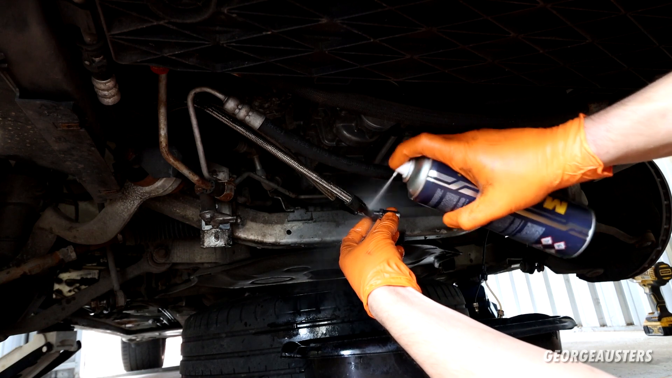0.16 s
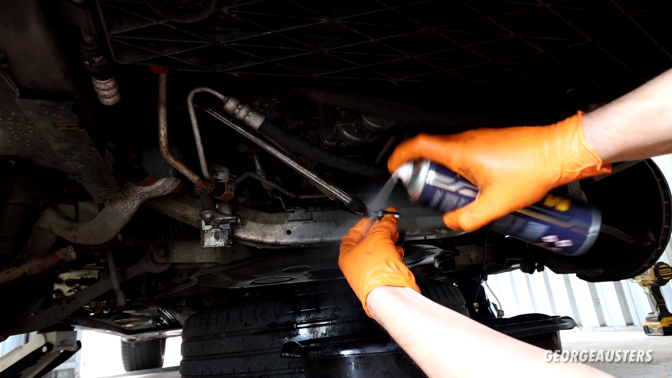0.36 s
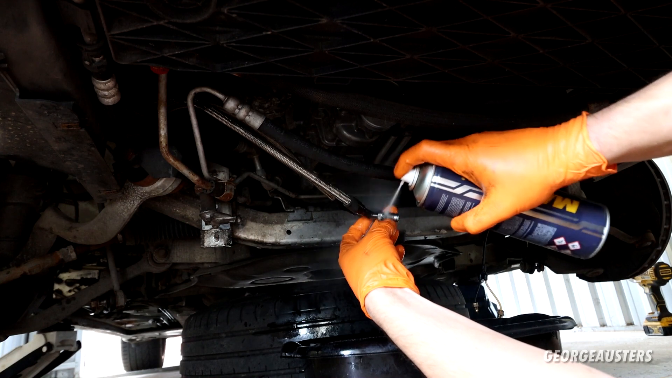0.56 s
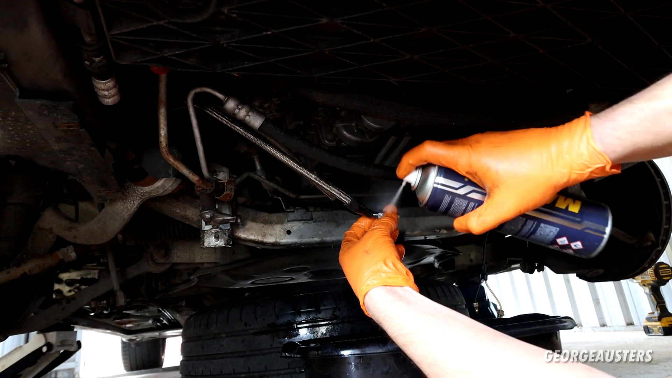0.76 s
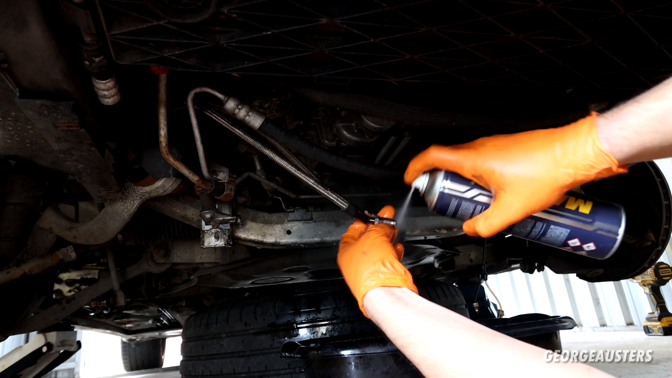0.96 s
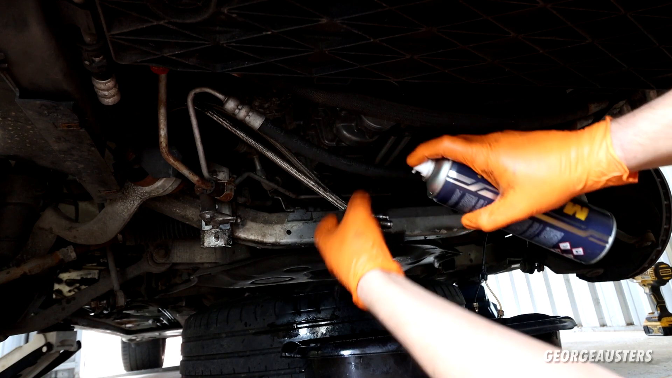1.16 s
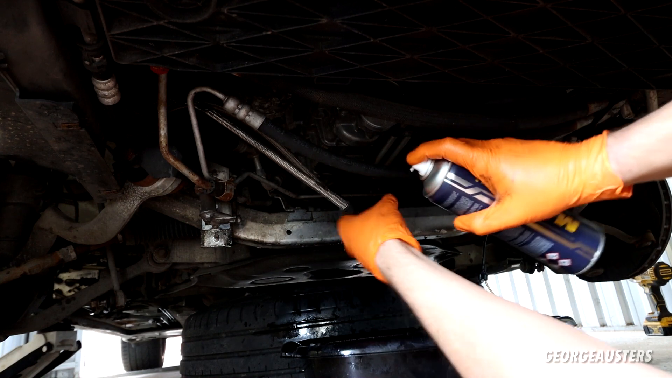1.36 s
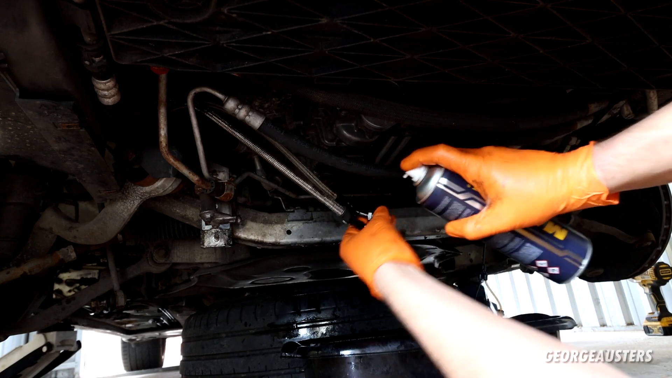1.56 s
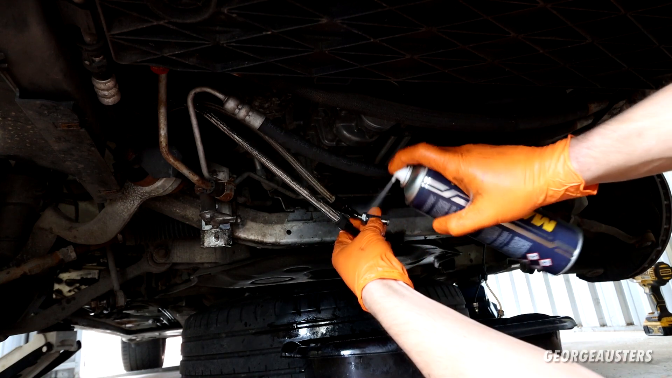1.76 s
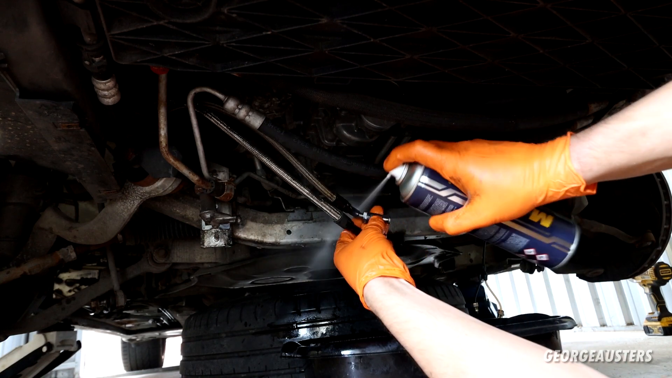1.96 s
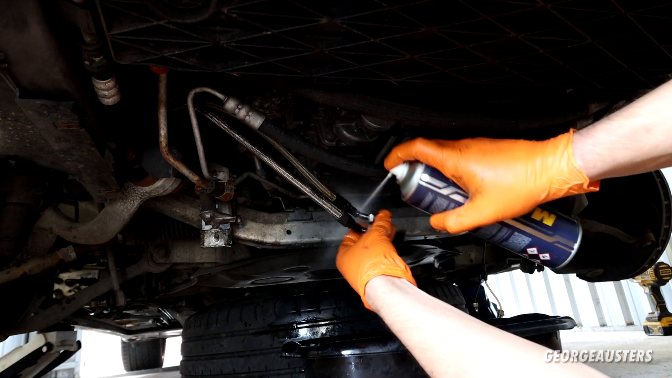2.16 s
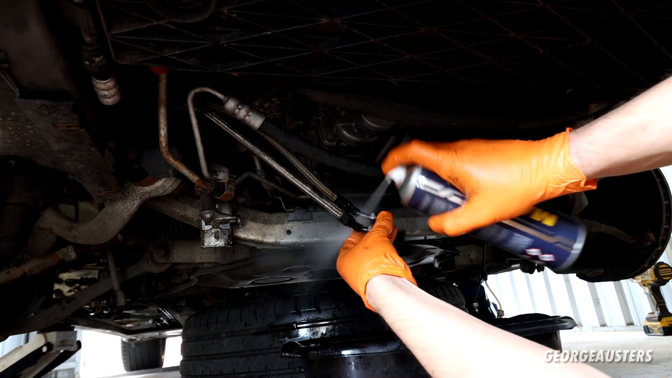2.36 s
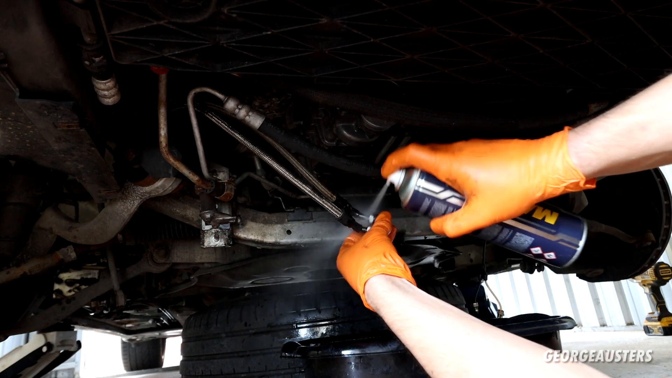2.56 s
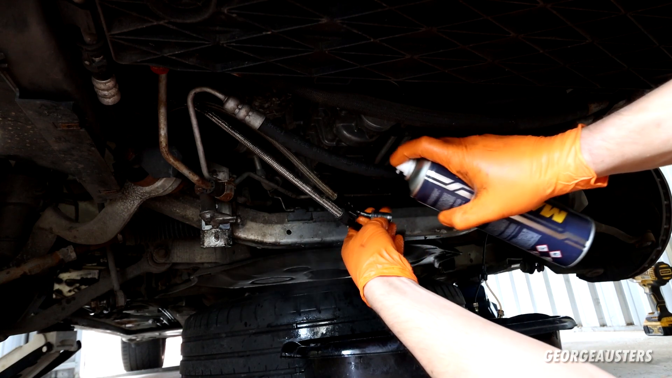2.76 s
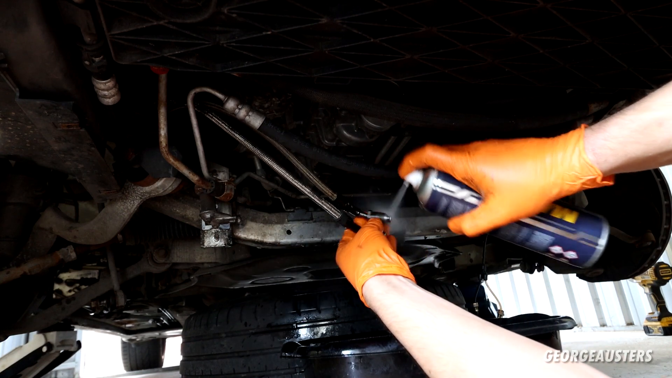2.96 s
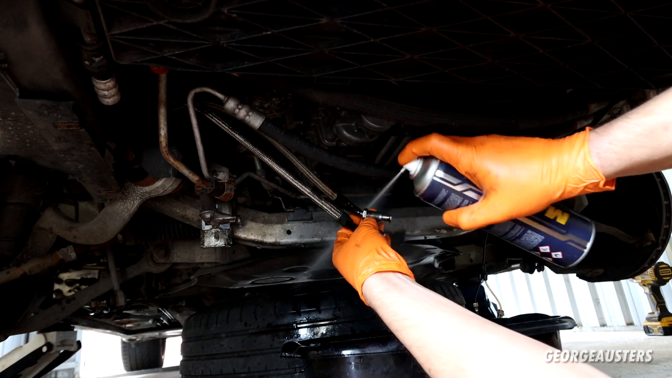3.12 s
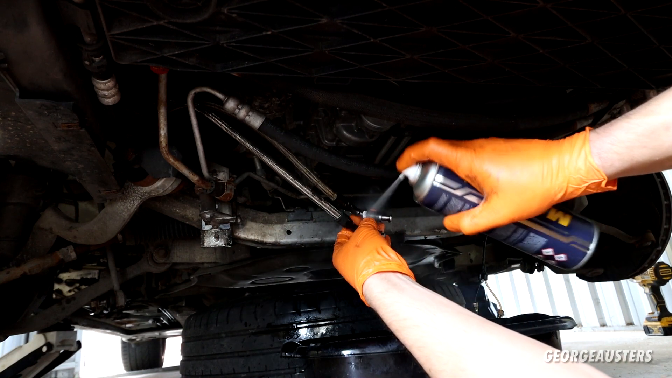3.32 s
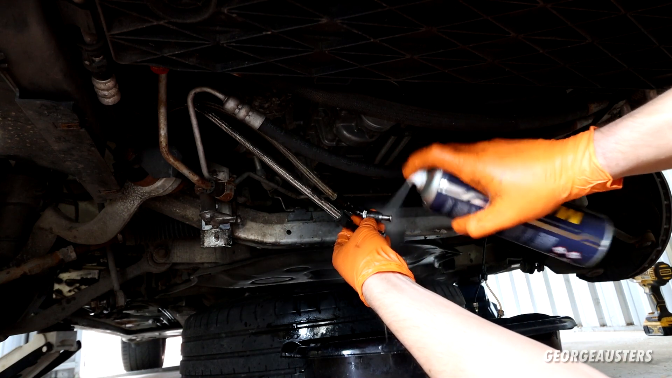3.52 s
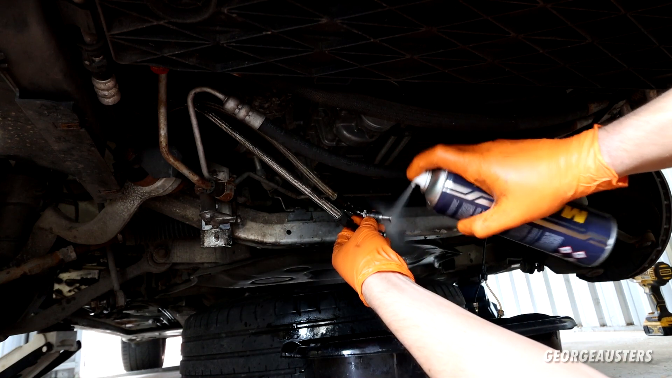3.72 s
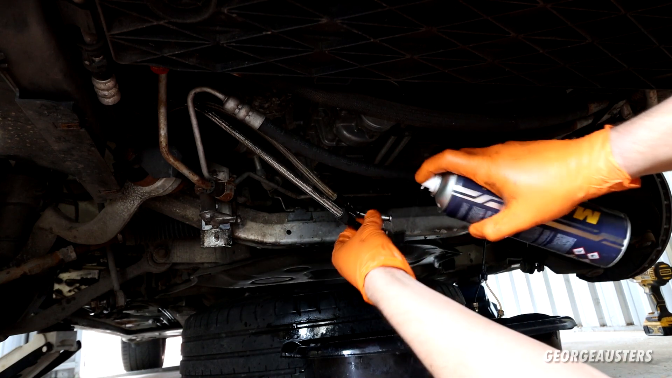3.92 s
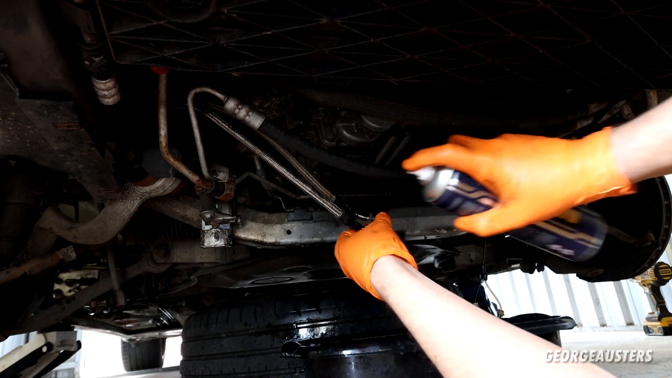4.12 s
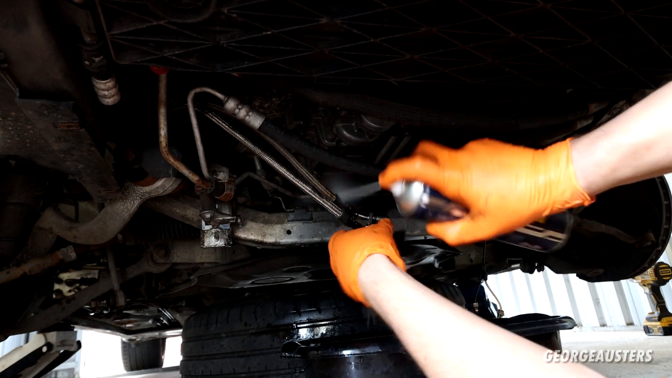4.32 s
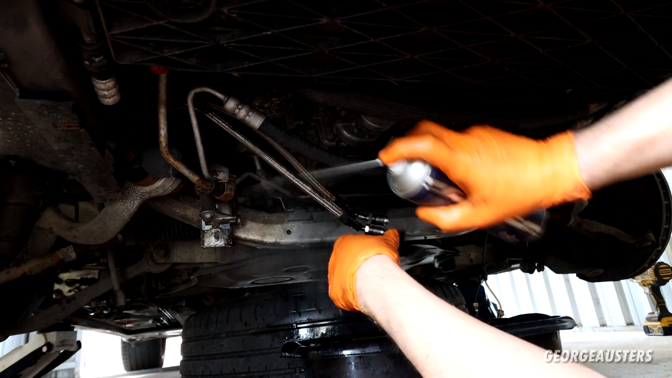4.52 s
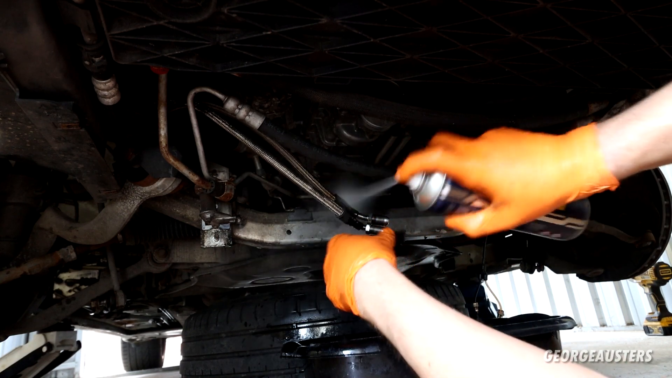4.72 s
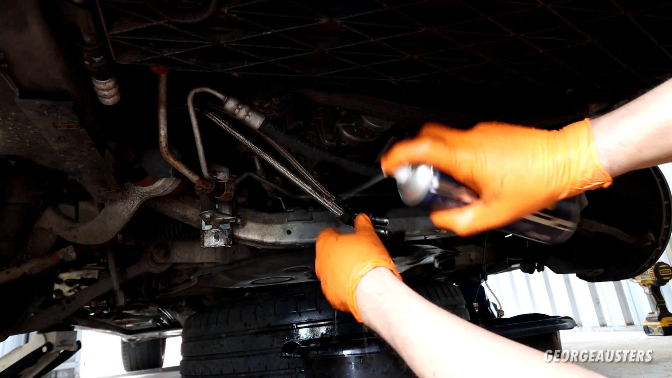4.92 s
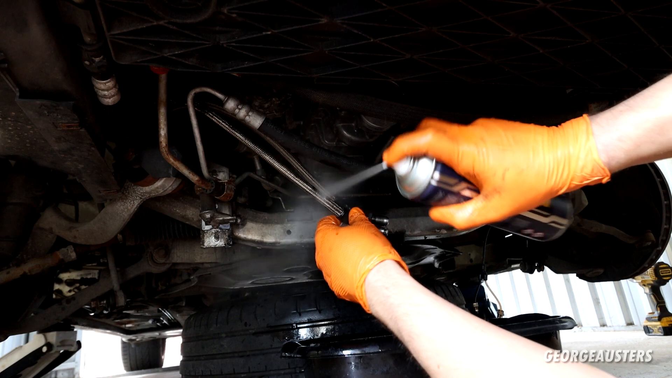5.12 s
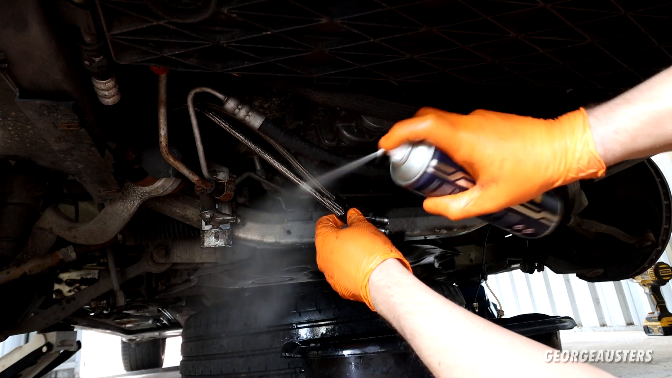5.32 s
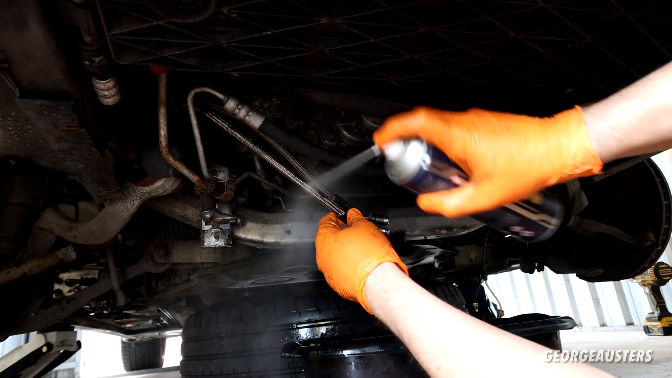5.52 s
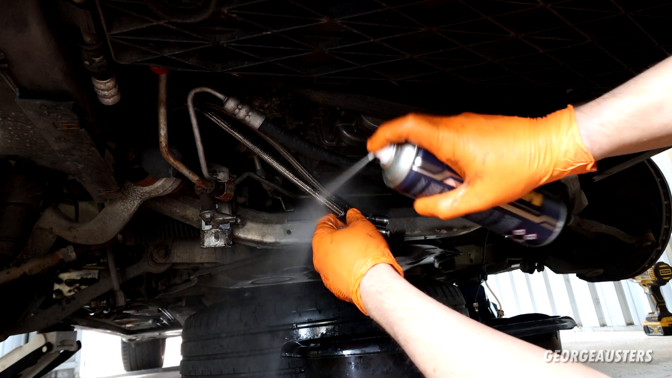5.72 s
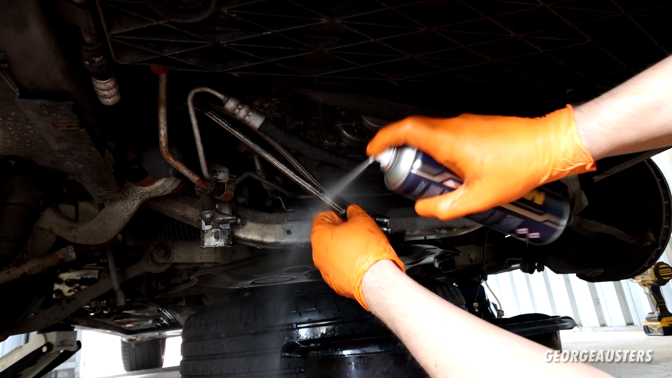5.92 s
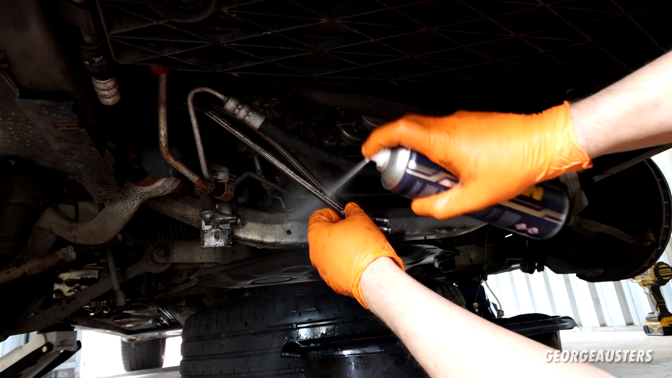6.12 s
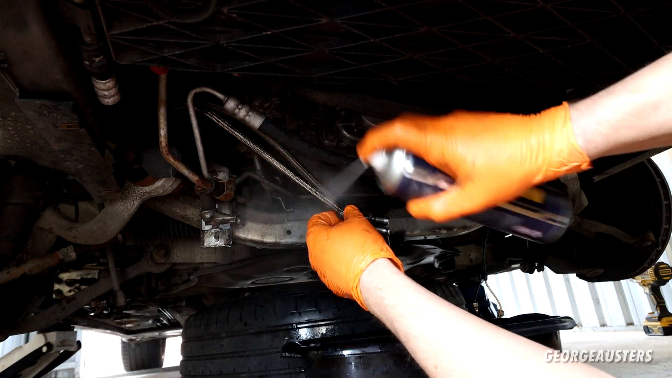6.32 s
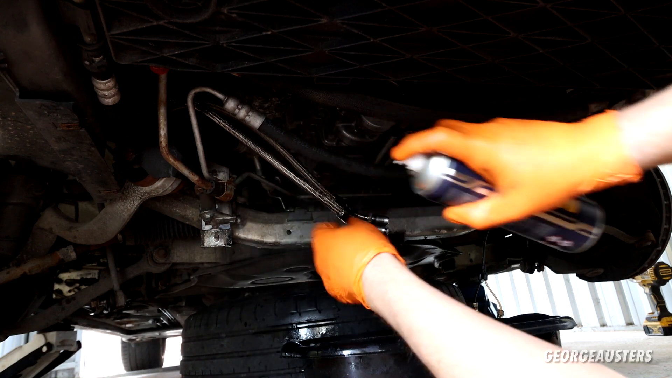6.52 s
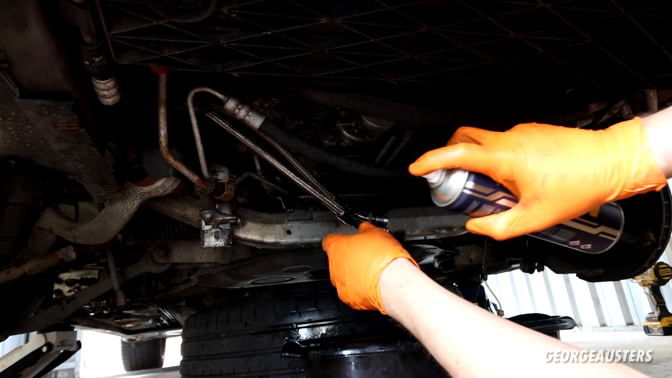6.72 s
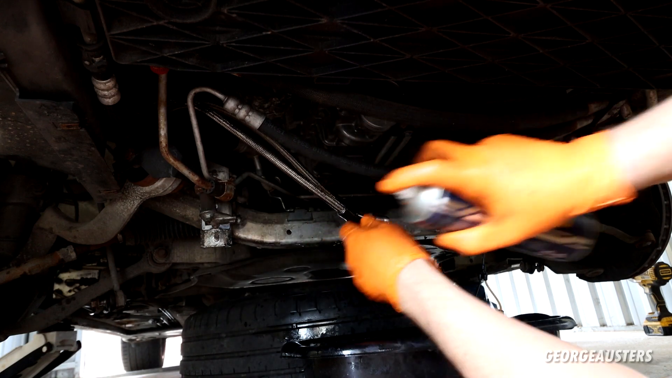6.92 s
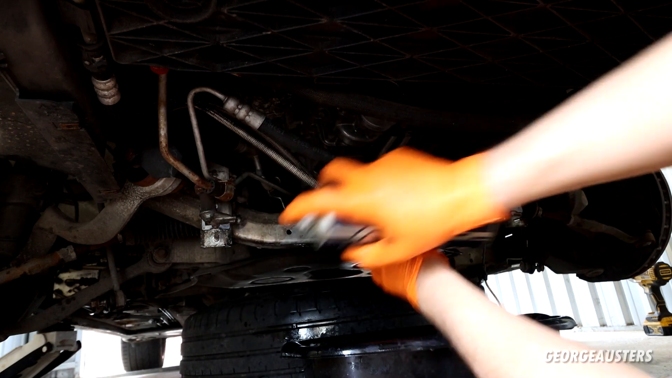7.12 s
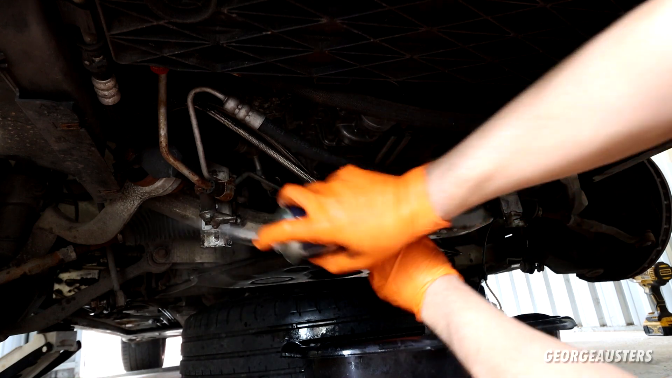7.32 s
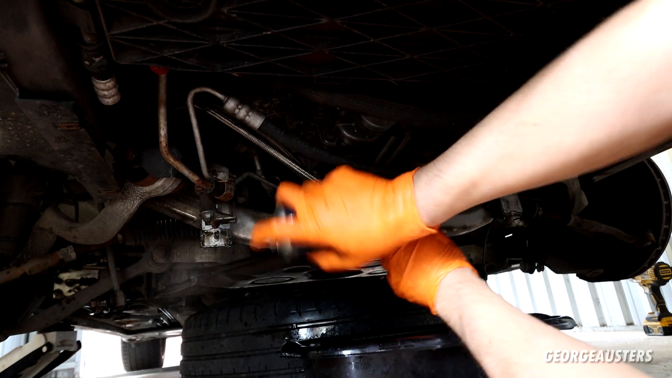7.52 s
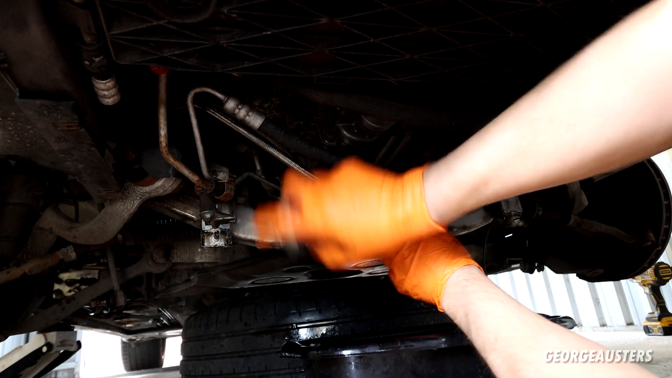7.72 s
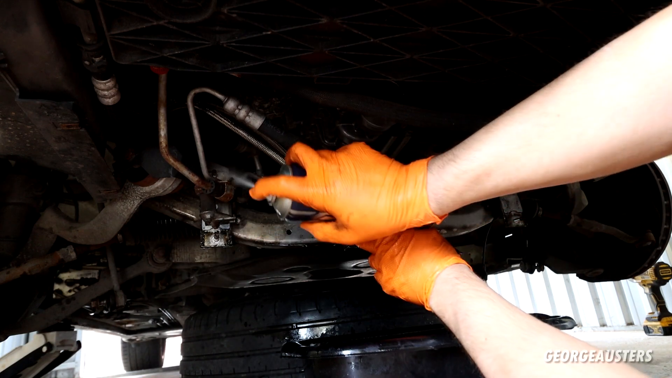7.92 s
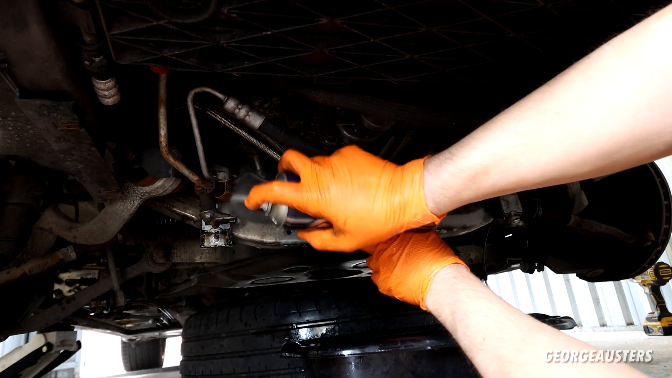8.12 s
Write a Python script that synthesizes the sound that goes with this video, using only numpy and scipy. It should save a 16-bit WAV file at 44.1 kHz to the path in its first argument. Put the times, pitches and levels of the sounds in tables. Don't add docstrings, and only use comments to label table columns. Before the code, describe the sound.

Close under a car in a garage, an aerosol can sprays in seven hissing bursts. The first is already running; two steady ones follow, then sweeping ones whose tone shifts as they cross pipes, and finally two hollower, fluttering ones. Between them gloves and sleeves rustle, the can ticks and knocks on metal. Faint birds, a dove and distant traffic lie behind. One microphone, short room echo.

```python
import sys
import numpy as np
from scipy import signal
from scipy.fft import rfft, irfft, next_fast_len
from scipy.io import wavfile
from scipy.ndimage import uniform_filter1d

SR = 44100
rng = np.random.default_rng(int(sys.argv[2]) if len(sys.argv) > 2 else 0)


def to_linear_factor(level_db):
    exponent = np.asarray(level_db, float) / 20
    return 10 ** exponent


def unload_audio(sound):
    columns = np.transpose(np.atleast_2d(sound))
    steps = np.round(np.clip(columns, -1, 1) * 32767)
    wavfile.write(sys.argv[1], SR, steps.astype(np.int16))


N = 364266
SIZE = next_fast_len(N)
HZ = np.maximum(np.fft.rfftfreq(SIZE, 1 / SR), 1)
TIME = np.arange(N) / SR


def rms_one(x):
    return x / np.sqrt(np.mean(x ** 2) + 1e-20)


def butter(x, order, hz, kind="low"):
    return signal.sosfilt(signal.butter(order, hz, kind, fs=SR, output="sos"), x)


def at_hz(points):
    hz, level_db = np.transpose(points)
    return to_linear_factor(np.interp(np.log(HZ), np.log(hz), level_db))


def bump(hz, centre_hz, octaves):
    return np.exp(-.5 * (np.log2(hz / centre_hz) / octaves) ** 2)


def drift(rate_hz):
    r = np.exp(-80 * np.pi * rate_hz / SR)
    slow = signal.lfilter([1], [1, -2 * r, r * r], rng.standard_normal(N // 40 + 2002))[2000:]
    return np.interp(np.arange(N) / 40, np.arange(len(slow)), rms_one(slow))


def noise(gain):
    return rms_one(irfft(rfft(rng.standard_normal(SIZE)) * gain, SIZE)[:N])


def gate(t0, t1, fade_s):
    return np.clip(np.minimum(TIME - t0, t1 - TIME) / fade_s + 1, 0, 1)


def passes(table):
    t = TIME[::44]
    flank_power = 2.6
    total_db = sum(level_db * np.exp(-np.abs((t - s) / half_s) ** flank_power) for s, half_s, level_db in table)
    return np.interp(TIME, t, total_db)


def whistles(table, fade_s, steady, blur):
    out = np.zeros(N)
    for t0, t1, start_hz, end_hz, level_db in table:
        on = slice(max(round((t0 - fade_s) * SR), 0), round((t1 + fade_s) * SR))
        t = TIME[on]
        wobble = butter(rng.standard_normal(SR), 4, blur * np.sqrt(start_hz))[-len(t):]
        strength = (steady + rms_one(wobble)) / np.hypot(steady, 1)
        phase = 2 * np.pi * np.cumsum(np.interp(t, [t0, t1], [start_hz, end_hz])) / SR
        out[on] += to_linear_factor(level_db + 1.5) * gate(t0, t1, fade_s)[on] * strength * np.sin(phase)
    return out


# Hz, level in dB per Hz.
STREET = [(15, -51.5), (25, -31.5), (75, 6.5), (154, 5), (438, -0.5), (749, -1), (1000, 0.5), (1310, -7.5),
          (2180, -13), (4380, -9), (6040, -37), (9770, -19), (12000, -30.5), (16000, -33)]
# Hz, level in dB.
MAINS_HUM = [(150, -77)]


def street():
    out = to_linear_factor(-65 + 0.72 * drift(2.5)) * noise(at_hz(STREET))
    for hz, level_db in MAINS_HUM:
        out += np.sqrt(2) * to_linear_factor(level_db + 2.2 * drift(3.25)) * np.sin(2 * np.pi * hz * TIME)
    return out


# press in seconds, release in seconds, flow in dB, opening time in seconds,
# lift of the thin air in dB.
BURSTS = [
    (-.1, 1.121, -34.5, .04, 0),
    (1.832, 2.743, -34.5, 0.044, 0.5),
    (2.986, 3.974, -35, 0.055, 0),
    (4.367, 4.914, -36, 0.035, -1.5),
    (5.017, 6.552, -37, 0.042, 0.5),
    (7.3, 7.88, -37.5, 0.03, 3),
    (7.995, 8.4, -41, 0.027, 5.5),
]
AIM = [0, 0, 0, 1, 1, 2, 2]


def burst_at(s):
    press_s = np.transpose(BURSTS)[0]
    return np.maximum(np.searchsorted(press_s - .02, s) - 1, 0)


# Hz, level in dB per Hz.
AT_FITTING = [(88, -51), (150, -25.5), (550, -16), (948, -10.5), (1290, -12), (2180, -11.5), (2450, -8.5),
              (2920, -15), (5540, -2), (6730, -5), (9540, -7.5), (15500, -18.5)]
ALONG_PIPE = [(88, -52.5), (150, -21), (290, -8.5), (530, -9), (912, -0.5), (1290, -4.5), (2410, -7.5),
              (2860, -8.5), (3350, -2), (5760, -1.5), (10100, -3.5), (15500, -16)]
INTO_FRAME = [(88, -42), (150, -14.5), (519, -6), (607, -9.5), (695, -3.5), (827, -6), (1090, -1),
              (1910, -2.5), (4750, -0.5), (9540, -5.5), (15500, -18)]
# Hz, width in Hz, lift in dB for aims 0, 1 and 2.
UNDERBODY = [(314, 290, 5, 0.5, 3.5), (950, 186, 7.5, 0.5, 3), (1496, 62, 7, 3, -2),
             (657, 70, 4.5, 0.5, 1.5), (1830, 160, 4.5, 0, -4), (2418, 76, 8, 6.5, 1.5),
             (2613, 104, 4.5, 1, 0.5), (3000, 1120, -1, 0.5, -2), (3490, 148, 4.5, -1, 1.5),
             (3696, 140, 7, -2.5, 1), (4500, 580, -4.5, -1.2, 0.5), (5177, 1360, 3.5, -2, 3.5),
             (5840, 930, 3, 2.5, 0.5), (7500, 250, 1, -0.5, -3), (9400, 460, 4.5, -0.3, 3.5),
             (11160, 760, 3, -1, -1.5)]


def jet_hiss(aim_now):
    hiss = []
    for aim, spectrum in enumerate([AT_FITTING, ALONG_PIPE, INTO_FRAME]):
        lift_db = sum(row[2 + aim] / (1 + (2 * (HZ - row[0]) / row[1]) ** 2) for row in UNDERBODY)
        hiss.append(noise(at_hz(spectrum) * to_linear_factor(lift_db)))
    return np.choose(aim_now, hiss)


# extra path in ms, level in dB.
REFLECTORS = [(.7, -18.5), (1.3, -39), (2.298, -19), (3.698, -9.5), (5.9, -33)]
SWAY_MS = [.03, .1, .12]


def reflect(jet, aim_now):
    heard = jet.copy()
    bright = butter(jet, 2, 2800, "high")
    for path_ms, level_db in REFLECTORS:
        lag = (path_ms + np.array(SWAY_MS)[aim_now] * drift(3)) * SR / 1000
        heard += to_linear_factor(level_db) * np.interp(np.arange(N) - lag, np.arange(N), bright)
    return rms_one(heard)


# time in seconds, half length in
# seconds, Hz, level in dB.
PARTS = [(0.136, 0.044, 2330.0, -3), (0.159, 0.039, 4470, 6), (0.444, 0.054, 9610.0, 0.5),
         (0.447, 0.052, 7630.0, 3), (0.618, 0.062, 2320, -3), (0.714, 0.044, 3710.0, 3.5),
         (0.826, 0.077, 2590, 8), (0.961, 0.15, 11430.0, -3), (1.928, 0.052, 3600.0, 3.5),
         (2.167, 0.045, 7200.0, 5), (2.177, 0.044, 4440, 5), (2.397, 0.038, 4410.0, 5),
         (3.23, 0.057, 7850.0, 3.5), (3.416, 0.064, 9340.0, 5.5), (3.518, 0.028, 2470.0, 3),
         (3.701, 0.047, 3710.0, 7), (3.828, 0.073, 11430.0, 3), (4.415, 0.0195, 2700.0, 8),
         (4.435, 0.037, 6230.0, 3.5), (4.461, 0.079, 3260, -9), (4.484, 0.097, 2590, 8),
         (4.773, 0.03, 8320.0, 2.5), (4.859, 0.041, 6600.0, 2), (5.06, 0.015, 3250.0, 6),
         (5.172, 0.034, 4670.0, 2), (5.306, 0.079, 2620.0, -3), (5.378, 0.042, 4840, 5),
         (5.515, 0.059, 4410.0, 0), (5.88, 0.058, 11100.0, 1.5), (6.083, 0.031, 5240.0, 2.5),
         (6.121, 0.043, 4280.0, -9.5), (6.362, 0.063, 2473, 6.5), (7.358, 0.033, 4500, -12),
         (7.488, 0.034, 2330.0, -9.5), (7.717, 0.052, 3500.0, 3), (7.735, 0.079, 2780.0, 2.5),
         (7.84, 0.05, 3000.0, 0),
         (4.429, 0.034, 3900, 8), (4.56, 0.039, 12500, 4), (4.57, 0.041, 4700, 3),
              (4.6, 0.077, 12200, 2), (4.65, 0.26, 4800, 0.5), (4.659, 0.054, 5900, 4),
              (4.775, 0.12, 4960, 3), (4.841, 0.054, 12800, 5), (4.87, 0.026, 10450, 2.5),
              (5.092, 0.039, 9330, 0), (5.117, 0.052, 4300, 3), (5.193, 0.031, 9900, -4),
              (5.21, 0.062, 3700, -3), (5.317, 0.041, 9600, 4), (5.521, 0.062, 12800, 0),
              (5.526, 0.044, 9100, 4), (5.608, 0.116, 5600, 0.5), (5.863, 0.055, 5600, 3),
              (5.875, 0.07, 9100, -4.5), (6.194, 0.065, 13200, -3), (6.255, 0.028, 9600, 2.5),
              (6.345, 0.063, 4650, -3), (6.5, 0.029, 4700, -7.5), (7.347, 0.0264, 7800, -9),
              (7.46, 0.057, 3990, 5), (7.764, 0.12, 7660, 5), (7.851, 0.025, 13200, -3),
              (8.044, 0.026, 9600, 2), (8.14, 0.041, 5660, -10), (8.147, 0.07, 7000, 4),
              (8.191, 0.045, 4200, 3), (8.202, 0.039, 12800, 4)]
FLICKER_DB = [.7, 1.2, 1.2]


def move_can(heard, boom_db, splash_db, thin_air_db, aim_now):
    whole, out, step_octaves, ring_octaves = rfft(heard, SIZE), 0, 1 / 5, 0.08
    for hz in 150 * 2 ** np.arange(0, 6.9, step_octaves):
        window = np.cos(np.pi / 2 * np.clip(np.log2(HZ / hz) / step_octaves, -1, 1)) ** 2
        move_db = bump(hz, 980, 0.99) * boom_db + bump(hz, 6020, 0.089) * splash_db
        move_db = move_db + bump(hz, 11700, 0.9) * thin_air_db
        near = [(s, half_s, db * bump(hz, part_hz, ring_octaves))
                for s, half_s, part_hz, db in PARTS
                if abs(np.log2(hz / part_hz)) < 3 * ring_octaves]
        if near:
            move_db = move_db + passes(near)
        flicker_db = (hz / 5000) ** 0.19 * np.array(FLICKER_DB)[aim_now] * drift(14.6)
        out = out + irfft(whole * window, SIZE)[:N] * to_linear_factor(move_db + flicker_db)
    return out


SCATTER_DB = [1.1, 1.4, 1.2]


def scatter(jet):
    hz, s, cells = signal.stft(jet, SR, nperseg=512)
    patches = rng.standard_normal(cells.shape)
    for _ in range(2):
        patches = uniform_filter1d(uniform_filter1d(patches, size=3, axis=0), size=6, axis=1)
    aim = np.array(AIM)[burst_at(s)]
    from_hz = 4500
    depth_db = np.array(SCATTER_DB)[aim] * np.clip(hz / from_hz - .5, 0, 1)[:, None]
    return signal.istft(cells * to_linear_factor(depth_db * rms_one(patches)), SR, nperseg=512)[1][:N]


# time in seconds, half length in seconds, flow in dB.
SURGES = [(.86, .22, 2), (1.866, .009, -3), (2.42, 0.03, 2.5), (3.39, 0.24, 2.2), (4.63, 0.079, 5.5),
          (4.81, 0.036, 3.5), (5.074, 0.051, 3), (5.28, 0.088, 2.5), (5.53, 0.32, 2), (5.664, 0.047, -3),
          (6.38, 0.043, 1), (6.525, 0.021, 7), (7.33, 0.026, 3.5), (7.605, 0.015, -8), (7.76, 0.13, 6),
          (8.062, 0.018, 9.5)]
# time in seconds, half length in seconds, air lost in dB.
HOLLOWS = [
    (4.42, 0.067, 0),
    (4.718, 0.0122, 3),
    (5.145, 0.007, 12),
    (7.605, 0.0094, 7),
    (7.655, 0.018, 6),
    (7.76, 0.098, 5.5),
    (7.83, 0.035, 3),
    (8.055, 0.0382, 9),
]
# time in seconds, half length in seconds, splash in dB.
PIPES = [(.75, 0.16, 0.5), (1.87, 0.019, -6), (2.63, 0.078, 0), (3.45, 0.42, -3.5), (4.66, 0.16, -7),
         (4.77, 0.022, -0.5), (5.274, .06, -6), (5.4, 0.06, -1), (5.66, 0.046, 9.5), (5.9, 0.07, 3),
         (6.12, 0.061, 7.5), (6.36, 0.053, 11), (7.325, 0.022, -4), (7.85, 0.0195, 4.5)]


def spray():
    press_s, release_s, full_db, opening_s, air_db = np.transpose(BURSTS)
    now = burst_at(TIME)
    aim_now = np.array(AIM)[now]
    valve = sum(gate(t0, t1, fade_s=0.00174) for t0, t1 in zip(press_s, release_s))
    surge_db, hollow_db = passes(SURGES), passes(HOLLOWS)
    cracked_open_db, closing_db, closing_s = -19, -14.5, 0.02
    weak_db = cracked_open_db * np.clip(1 - (TIME - press_s[now]) / opening_s[now], 0, 1)
    sag_db = closing_db * np.clip(1 - (release_s[now] - TIME) / closing_s, 0, 1)
    flow_db = full_db[now] + weak_db + sag_db + surge_db
    boom_db = -0.522 * weak_db - 1.015 * surge_db + 0.97 * hollow_db
    thin_air_db = air_db[now] + 0.63 * weak_db - 0.99 * surge_db - hollow_db
    heard = reflect(jet_hiss(aim_now), aim_now)
    jet = move_can(heard, boom_db, passes(PIPES), thin_air_db, aim_now)
    droplets_db = 0.43 * drift(83)
    return scatter(jet * valve * to_linear_factor(flow_db + droplets_db))


def garage(x):
    t60_s, top_t60_s, wall_cut_hz, level_db = 0.31, 0.19, 4100, -11.5
    t = TIME[:SR // 2]
    white = rng.standard_normal(len(t))
    low = butter(white, 1, wall_cut_hz)
    echoes = low * to_linear_factor(-60 * t / t60_s) + (white - low) * to_linear_factor(-60 * t / top_t60_s)
    echoes *= np.clip(t / 0.00722 - .5, 0, 1)
    return to_linear_factor(level_db) * signal.fftconvolve(x, echoes / np.sqrt(np.sum(echoes ** 2)))[:N]


# time in seconds, low edge in Hz, high edge in Hz, level in dB.
SLIPS = [(.025, 10460, 11500, -63), (.396, 4380, 5200, -49), (.605, 7030, 8770, -41),
         (2.022, 4230, 5400, -45), (2.022, 6100, 8300, -45.5), (5.203, 4300, 5240, -47.5),
         (5.203, 8500, 9600, -48), (5.412, 10320, 11500, -52.5), (6.062, 4200, 5240, -52),
         (6.062, 9600, 11200, -51.5), (6.224, 9060, 10300, -47), (6.224, 13100, 15200, -59.5),
         (6.364, 11200, 12340, -52)]


def slips():
    half = 1024
    around = np.arange(-half, half)
    out = np.zeros(N)
    for s, low_hz, high_hz, level_db in SLIPS:
        puff = rms_one(butter(rng.standard_normal(2 * half), 6, [low_hz, high_hz], "band"))
        out[round(s * SR) + around] += to_linear_factor(level_db) * puff * np.cos(np.pi / 2 * around / half)
    return out * [[1], [-1]]


# start in seconds, end in seconds, glove in dB, sleeve in dB, swell in dB per s.
RUBS = [(1.166, 1.325, -65.5, -61, 2), (1.34, 1.497, -57.5, -58, -10), (1.52, 1.66, -64.5, -58.5, -125),
        (1.71, 1.84, -68, -66.5, -55), (2.804, 2.99, -69.5, -90, -3.5), (4.04, 4.1, -65, -60, -125),
        (4.115, 4.173, -59, -60, -170), (4.203, 4.378, -63, -60.5, 69.5), (4.929, 4.985, -49, -54.5, -300),
        (4.999, 5.028, -65, -66, 110), (6.58, 6.98, -64.5, -63, -28), (6.999, 7.064, -65, -62, -105),
        (7.088, 7.147, -62, -57.5, -84.5), (7.155, 7.31, -58.5, -64.5, -14),
        (7.897, 8.01, -51, -54.5, -105)]
# Hz, level in dB per Hz.
GLOVE = [(820, -9), (1400, 2), (1830, 0.5), (3740, 0.5), (5790, 0.5), (7130, -5), (11700, -17),
         (15000, -25.5)]
# Hz, level in dB per Hz.
SLEEVE = [(120, -21.5), (200, -9), (290, -3), (555, -5.5), (1040, -5), (1500, -15.5), (1950, -31.5),
          (3300, -120)]


def rustle():
    glove, sleeve = 0, 0
    for t0, t1, glove_db, sleeve_db, swell_db_per_s in RUBS:
        swell_db = swell_db_per_s * np.clip(TIME - t0, 0, t1 - t0)
        moving = gate(t0, t1, fade_s=0.035)
        glove = np.maximum(glove, moving * to_linear_factor(glove_db + swell_db))
        sleeve = np.maximum(sleeve, moving * to_linear_factor(sleeve_db + 0.82 * swell_db))
    grain = to_linear_factor(0.87 * drift(58) + 0.98 * drift(18))
    return grain * (glove * noise(at_hz(GLOVE)) + sleeve * noise(at_hz(SLEEVE)))


# start in seconds, end in seconds, start Hz, end Hz, level in dB.
SMALL_BIRDS = [(1.19, 1.33, 4800, 4500, -64), (1.565, 1.6, 8200, 7900, -75.5),
               (1.59, 1.63, 7600, 7300, -74), (1.61, 1.693, 6600, 6800, -70.5),
               (1.665, 1.71, 5760, 5470, -72), (1.715, 1.763, 5640, 6550, -67.5),
               (1.75, 1.84, 6900, 6900, -65), (1.717, 1.84, 3900, 4080, -72.5),
               (2.78, 2.98, 6360, 6440, -65.5), (2.89, 2.97, 4400, 4240, -64),
               (4.19, 4.36, 4700, 6200, -67), (6.6, 6.8, 6100, 6030, -78.5)]
# start in seconds, end in seconds, start Hz, end Hz, level in dB.
DOVE = [
    (7.0, 7.08, 439, 508, -63.5),
    (7.11, 7.2, 542, 543, -58.5),
    (7.38, 7.62, 542, 534, -56),
    (8.1, 8.26, 506, 522, -56),
]


def birds():
    chirps = whistles(SMALL_BIRDS, fade_s=0.021, steady=0.41, blur=5.2)
    return chirps + whistles(DOVE, fade_s=0.018, steady=1.9, blur=0.85)


# time in seconds, crack in dB, centre in Hz, T60 in seconds, width in octaves.
TICKS = [(1.485, -53, 3800, 0.054, 1.2), (1.536, -59, 5500, 0.049, 1.05), (1.685, -64, 5870, 0.062, 2.2),
         (1.345, -54, 5400, 0.26, .4), (6.762, -72, 5000, .03, 1.8), (6.988, -72, 8500, .05, .8),
         (1.756, -56, 6000, 0.063, 1.4), (1.756, -52, 4250, 0.066, 0.16), (1.756, -51, 5800, 0.089, 0.116),
         (1.832, -56, 6000, .09, 1.55), (1.858, -39, 6000, .07, 1.2), (2.99, -54.5, 5000, 0.093, 1.87),
         (4.05, -53.5, 5000, 0.057, 1.64), (4.107, -46, 4500, 0.065, 1.6),
         (4.107, -48.5, 9300, 0.057, 0.23), (5.135, -39, 1000, 0.092, 0.87),
         (4.111, -46.5, 1060, 0.15, 0.33), (6.827, -60, 1350, 0.05, 0.7), (6.991, -60, 4500, 0.072, 0.51),
         (7.008, -76, 7000, 0.053, 1.3), (7.072, -52, 1800, 0.054, 2.3), (7.077, -56, 7000, 0.079, 0.93),
         (7.086, -47.5, 1200, 0.17, 2.2), (7.17, -57, 6500, 0.74, 1.33), (7.185, -47, 4500, 0.05, 2.17),
         (7.968, -40.5, 3830, 0.076, 0.37), (7.968, -48, 6400, 0.069, 0.25),
         (8.01, -41.5, 4000, 0.069, 2.1)]


def ticks():
    out, t = np.zeros(N), TIME[:SR // 4]
    for s, crack_db, hz, t60_s, octaves in TICKS:
        half_width = 2 ** (octaves / 2)
        edges_hz = [hz / half_width, min(hz * half_width, .45 * SR)]
        crack = butter(rng.standard_normal(len(t)), 2, edges_hz, "band")
        start = round(s * SR)
        out[start:start + len(t)] += rms_one(crack) * to_linear_factor(crack_db - 60 * t / t60_s)
    return out


def ring(s, peak_db, hz, t60_s):
    out, start = np.zeros(N), round(s * SR)
    t = np.arange(min(round(1.3 * t60_s * SR), N - start)) / SR
    cluster = np.sin(2 * np.pi * hz * t)
    cluster += 0.3 * np.sin(2 * np.pi * .953 * hz * t)
    cluster += 0.25 * np.sin(2 * np.pi * 0.95 * hz * t)
    out[start:start + len(t)] = to_linear_factor(peak_db + 5.0 - 60 * t / t60_s) * (1 - np.exp(-2 * hz * t)) * cluster
    return out


# time in seconds, peak in dB, Hz, T60 in seconds.
KNOCKS = [(1.41, -44, 600, .01), (1.41, -50, 850, .012), (1.756, -60.5, 3245, .04), (1.756, -64, 9550, .05),
          (1.826, -57, 1000, .04), (2.981, -54, 900, .06), (4.05, -54.5, 3920, .027),
          (4.055, -67.5, 2061, .76), (4.107, -52.5, 5210, .04), (4.107, -57, 4350, .051),
          (4.974, -56.5, 2600, .02), (5.14, -47.5, 950, .068), (5.14, -45, 1557, .06),
          (5.14, -46.5, 662, .079), (6.652, -57, 400, .03), (6.74, -65, 801, .069), (6.755, -63, 420, .039),
          (6.995, -64.5, 1788, .05), (7.0, -61, 986, .09), (7.03, -67.5, 1698, .08),
          (7.072, -51, 900, .029), (7.085, -42, 990, .02), (7.086, -43.5, 2600, .004),
          (7.185, -42.5, 3210, .028), (7.186, -44, 5800, .029), (7.187, -55, 4310, .097),
          (7.188, -58.5, 3443, .098), (7.193, -48.5, 5766, .073), (7.32, -44.5, 169, .056),
          (7.322, -52.5, 110, .08), (7.323, -47.5, 300, .042), (7.44, -44, 301, .047),
          (7.888, -40, 4090, .042), (7.967, -50, 3000, .012), (7.968, -50, 3526, .077),
          (7.968, -47, 4390, .077), (7.968, -49, 6380, .055), (7.968, -51.5, 7030, .05),
          (7.969, -48.5, 3880, .09), (7.969, -54.5, 6000, .09)]
# time in seconds, peak in dB.
DRIPS = [
    (6.654, -60.5),
    (6.693, -62),
    (6.828, -66.5),
]
# start in seconds, length in seconds, start Hz, end Hz, level in dB.
THUMPS = [(4.805, .016, 292.2, 286.4, -48), (5.108, 0.042, 262, 302, -47), (6.238, 0.024, 292, 292, -47.5),
          (6.278, 0.012, 273, 268.6, -47), (6.557, 0.0274, 297, 290, -54), (7.439, 0.0126, 364.4, 350, -48),
          (7.448, 0.034, 283, 283, -54)]


def knocks():
    drags = [(s, s + length_s, *rest) for s, length_s, *rest in THUMPS]
    out = whistles(drags, fade_s=.012, steady=2.6, blur=2.5)
    drops = [(s, peak_db, 8200, 0.011) for s, peak_db in DRIPS]
    for strike in KNOCKS + drops:
        out += ring(*strike)
    return butter(out, 2, 70, "high")


# start in seconds, end in seconds, start Hz, end Hz, level in dB.
CREAKS = [
    (1.705, 1.735, 950, 1006, -59),
    (6.836, 6.848, 1390, 1480, -61),
    (2.775, 2.835, 431.2, 440.7, -62),
]


def creaks():
    return whistles(CREAKS, fade_s=.012, steady=0.79, blur=4.8)


# start in seconds, end in seconds, start Hz, end Hz, level in dB.
EDGES = [(2.388, 2.418, 5000, 4813, -38.5), (4.41, 4.552, 2330, 1980, -51), (4.71, 4.729, 1430, 1480, -49),
         (4.412, 4.47, 7730, 7800, -42), (4.55, 4.628, 7670, 8040, -43), (4.74, 4.82, 7840, 7720, -42),
         (4.822, 4.882, 4364, 4190, -44), (5.06, 5.132, 7160, 7220, -48), (5.16, 5.2, 4500, 4500, -53),
         (5.383, 5.47, 6430, 7050, -40.5), (6.299, 6.398, 6200, 6210, -44), (7.587, 7.606, 916, 980, -48),
         (7.638, 7.685, 1124, 1000, -43.5), (7.64, 7.68, 1300, 1320, -51), (7.746, 7.766, 703, 700, -47),
         (7.68, 7.71, 5400, 5450, -42), (7.749, 7.762, 957, 970, -42), (7.804, 7.829, 1042, 1057, -40.5),
         (7.783, 7.8, 4770, 4700, -39), (7.815, 7.858, 4990, 5050, -44), (7.44, 7.47, 5215, 4800, -45),
         (7.82, 7.867, 3740, 3948, -41), (8.026, 8.067, 1014, 1018, -43), (8.058, 8.08, 1610, 1610, -43),
         (8.094, 8.26, 3990, 3900, -48)]


def edge_whistles():
    edges = whistles([row for row in EDGES if row[2] > 1700], fade_s=.018, steady=0.35, blur=4.2)
    hollows = whistles([row for row in EDGES if row[2] < 1700], fade_s=.012, steady=1.2, blur=3)
    return edges + hollows


def scene():
    near = spray() + edge_whistles() + ticks() + knocks()
    mono = near + garage(near) + rustle() + creaks() + birds() + street()
    return np.array([mono, mono])


def drop_faint(x):
    edges_hz, floor_db = np.arange(12900, 16100, 350), -100.5
    hz, _, cells = signal.stft(x, SR, nperseg=2048)
    for low_hz, high_hz in zip(edges_hz, edges_hz[1:]):
        band = (hz >= low_hz) & (hz < high_hz)
        power = np.sum(np.abs(cells[band]) ** 2, axis=0) * 4 / 3
        cells[band] *= 10 * np.log10(power + 1e-20) > floor_db
    return signal.istft(cells, SR, nperseg=2048)[1][:N]


def low_pass(x):
    return signal.sosfilt(signal.butter(12, 16930, fs=SR, output="sos"), x)


def record(dry):
    mono = butter(dry.mean(axis=0), 2, 40, "high")
    top_cut_hz = 15730
    band = signal.sosfilt(signal.ellip(12, .5, 80, top_cut_hz, fs=SR, output="sos"), mono)
    return low_pass(drop_faint(band) + slips())


dry = scene()
out = record(dry)
unload_audio(out)
```